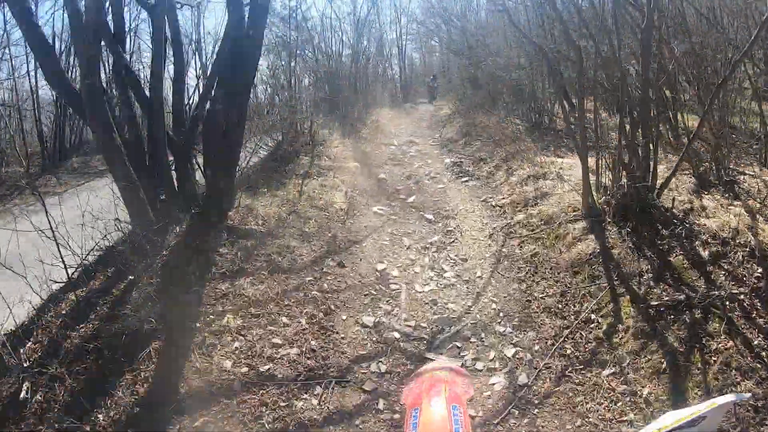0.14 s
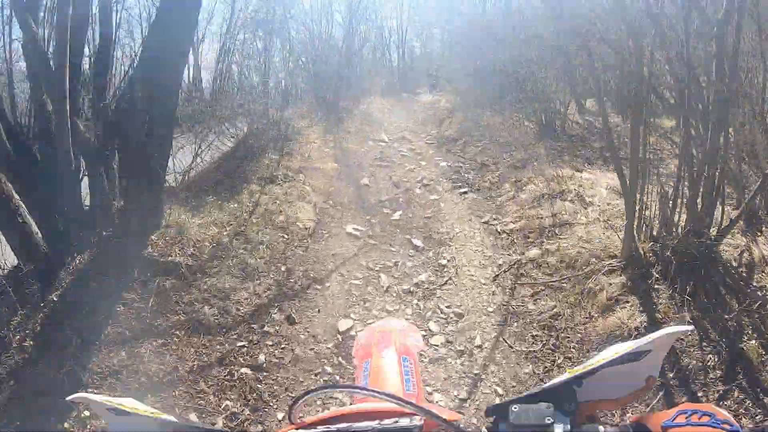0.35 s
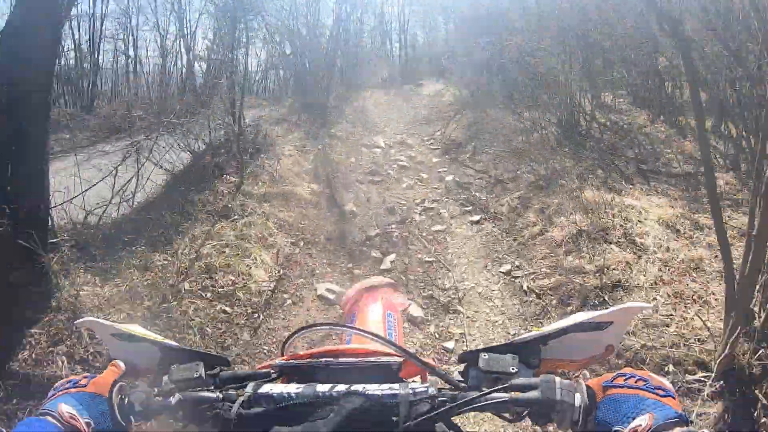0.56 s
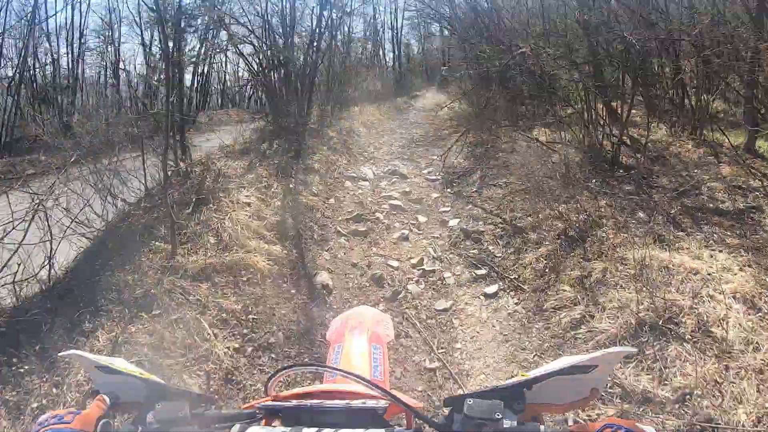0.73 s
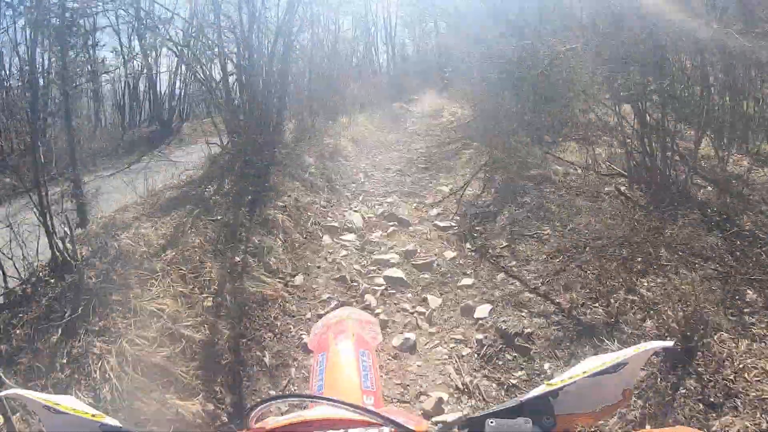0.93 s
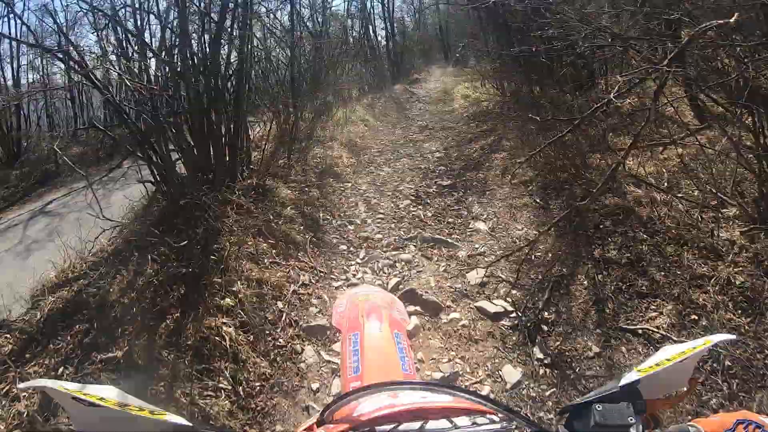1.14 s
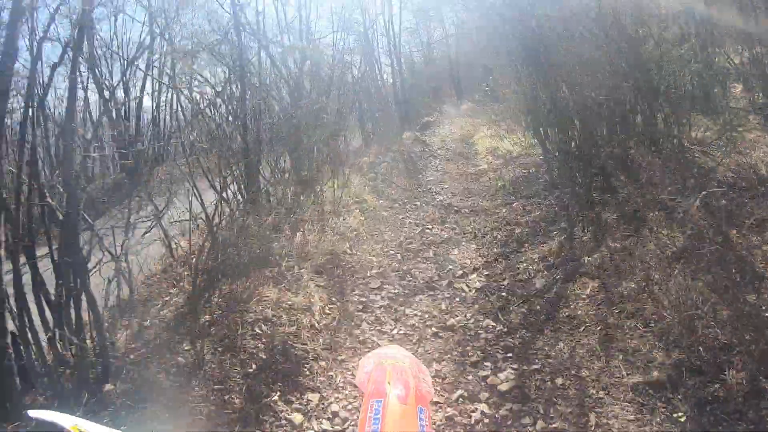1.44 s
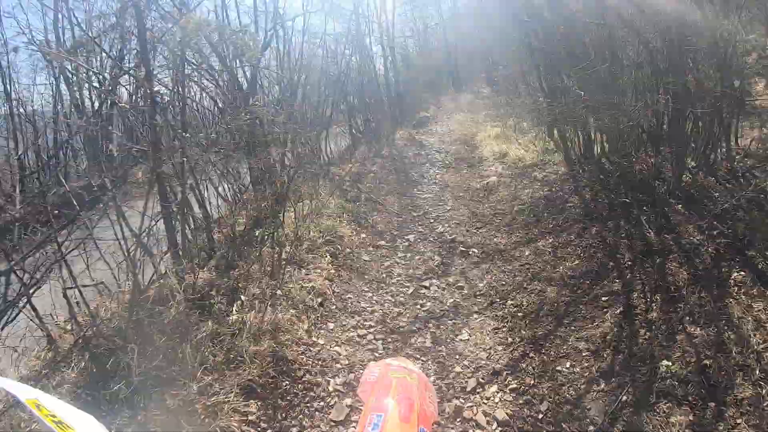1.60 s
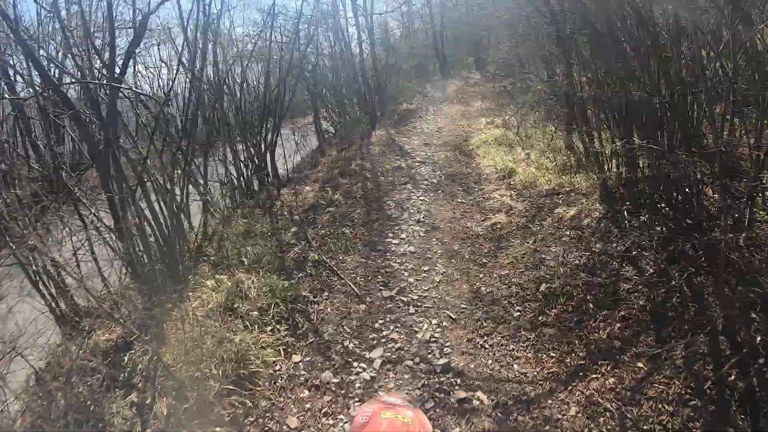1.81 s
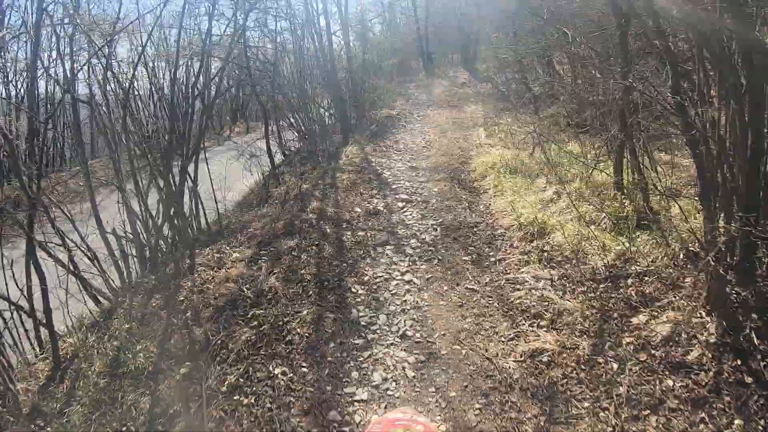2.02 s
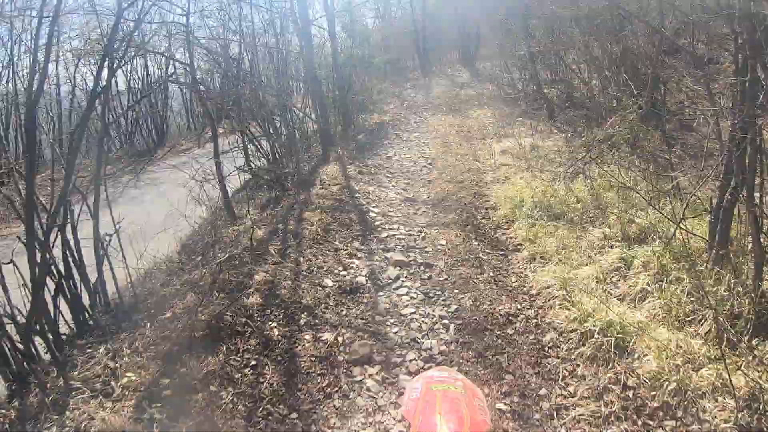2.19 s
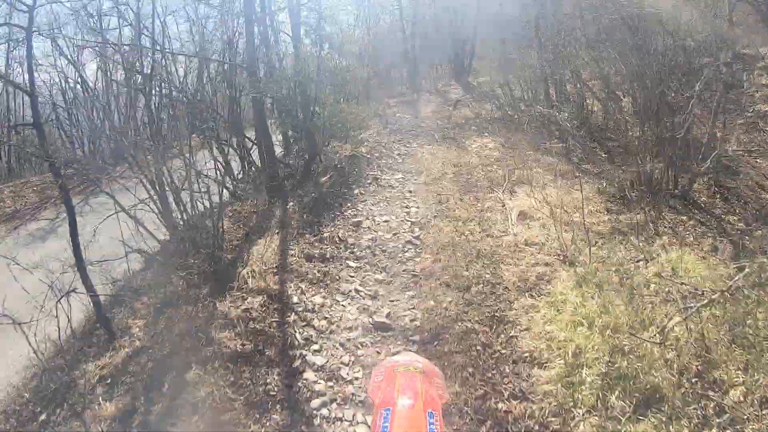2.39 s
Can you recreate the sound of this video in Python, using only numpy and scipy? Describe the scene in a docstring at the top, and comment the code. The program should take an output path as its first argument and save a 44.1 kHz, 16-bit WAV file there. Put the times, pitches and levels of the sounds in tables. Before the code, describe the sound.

A single-cylinder dirt bike climbs a stony woodland trail, heard close from the rider's seat: brief quiet coasting, a steady hollow intake honk, rising uneven revs, a throttle gap and blip, a last climb, then burbling deceleration.

```python
"""A single-cylinder dirt bike climbs a stony trail, heard from the rider's seat.
With the throttle open the airbox honks once per firing, as engine orders pass under its resonance.
The exhaust, also a sum of orders, barks roughly where the revs flare; at the end the throttle shuts
and decaying silencer modes burble. Filtered noise makes the clatter, hiss and clacks of the machine,
and the rumble of wind and ground beneath."""
import sys
import numpy as np
from scipy import signal
from scipy.fft import rfft, irfft, next_fast_len
from scipy.io import wavfile

SR = 44100
rng = np.random.default_rng(int(sys.argv[2]) if len(sys.argv) > 2 else 0)


def transcribe(signal):
    """Save signal, clipped to [-1, 1], as a 16-bit WAV file at the path in sys.argv[1]."""
    frames = np.atleast_2d(signal).T
    limited = np.clip(frames, -1, 1)
    pcm = np.round(limited * 32767).astype(np.int16)
    wavfile.write(sys.argv[1], SR, pcm)


N = 112454

# Strength of the intake honk, following the throttle. Each row: time in seconds, level in dB.
THROTTLE_LEVEL = [(0,-24.5),(.07,-37.5),(.18,-37),(.205,-18),(.228,-11),(.8,-11),(.88,-13.5),(1.0,-15),(1.12,-17.5),(1.27,-16.5),(1.32,-30.5),(1.385,-53),(1.405,-20),(1.417,-9.5),(1.46,-11.5),(1.485,-18),(1.52,-12.5),(1.56,-24.5),(1.61,-10),(1.8,-11.5),(1.9,-9.5),(2.11,-9),(2.15,-18),(2.18,-29),(2.55,-41.5)]
# Exhaust pulses. Each row: time in seconds, level in dB, roughness from 0 to 1.
EXHAUST_PULSES = [(0,-35.5,0.2),(.12,-37,0),(.24,-27.5,0.11),(.7,-26.5,0),(.93,-24,0.25),(1.04,-23.5,0.54),(1.28,-19.5,0),(1.37,-35,0.55),(1.44,-29,0.3),(1.51,-16,0.3),(1.57,-22.5,0.1),(1.64,-26,.2),(1.8,-24,0.25),(2.08,-45.5,.2),(2.15,-16.5,0.3),(2.19,-35,0.8),(2.55,-49,.7)]


def from_db(db):
    """Amplitude ratio of a level: 20 dB is a factor of ten."""
    return 10 ** (np.asarray(db) / 20)


def rms_one(x):
    """Normalise to unit mean-square power."""
    return x / np.sqrt(np.mean(x ** 2) + 1e-20)


def in_time(rows):
    """Linear interpolation: one curve for each column after the time."""
    seconds, *columns = np.transpose(rows)
    return [np.interp(np.arange(N) / SR, seconds, column) for column in columns]


def drift(rate_hz):
    """Random modulation of unit spread: white noise through two equal low-pass poles at rate_hz."""
    step = 40  # samples between the points of the slow curve
    warm_up = 2000  # points dropped while the filter settles
    pole = np.exp(-2 * np.pi * rate_hz * step / SR)
    noise = rng.standard_normal(N // step + warm_up + 2)
    slow = signal.lfilter([1], [1, -2 * pole, pole * pole], noise)[warm_up:]
    return np.interp(np.arange(N) / step, np.arange(len(slow)), rms_one(slow))


def colour(x, spectrum):
    """Spectral shaping: multiply the spectrum by a (Hz, dB) curve, then set unit power."""
    hz, db = np.transpose(spectrum)
    size = next_fast_len(N + SR // 2)  # padded against wrap-around
    f = np.maximum(np.arange(size // 2 + 1) * SR / size, 1)
    gain = from_db(np.interp(np.log(f), np.log(hz), db))
    return rms_one(irfft(rfft(x, size) * gain, size)[:N])


def beating_noise(cycles, share, fall):
    """Amplitude-modulated noise: a share of it jumps at each firing and decays through the cycle."""
    flare = rms_one(np.exp(-fall * (cycles % 1)))
    return rng.standard_normal(N) * (1 - share + share * flare)


def orders(cycles, speed, spectrum, rough, count):
    """Harmonic synthesis: multiples of the firing rate under a fixed colour, fluttering when rough."""
    pipe_lag = .347  # cycles behind the intake
    pipe_smear = .314  # radians per order squared: reflections spread each pulse
    hz, db = np.transpose(spectrum)
    out, power = 0, 0
    for k in range(1, count + 1):
        gain = from_db(np.interp(np.log(k * speed), np.log(hz), db))
        angle = 2 * np.pi * k * (cycles - pipe_lag) - pipe_smear * k * k
        in_phase = (1 + rough * drift(14)) * np.cos(angle)
        quadrature = rough * drift(31) * np.sin(angle)
        out = out + gain * (in_phase + quadrature)
        power = power + gain ** 2 * (.5 + rough ** 2)
    return out / np.sqrt(power)  # nominally unit power


def intake(cycles, speed):
    """Forced resonance: each gulp of air drives the airbox, whose steep peak selects engine orders."""
    # Moving airbox resonance. Each row: time in seconds, centre in Hz, width in Hz of one section.
    airbox = [(0,254,60),(.2,266.7,100),(.32,242.2,90),(.5,244.4,112),(.75,245,120),(.87,283,110),(.97,284,78),(1.1,276,150),(1.26,268,165),(1.46,296.4,91),(1.59,299,110),(1.66,247.6,85),(1.78,266.3,70),(1.88,251.6,130),(1.97,270,135),(2.13,247.5,129)]
    wobble_db, rough_wobble_db = 0.05, 2.0  # spread of strength: always, and at full roughness
    jitter = 0.0037  # spread of timing, cycles
    level_db, = in_time(THROTTLE_LEVEL)
    centre, width = in_time(airbox)
    _, rough = in_time(EXHAUST_PULSES)
    turn = np.exp(2j * np.pi * (cycles + jitter * drift(51)))
    out, power = 0, 0
    for k in range(1, 11):
        hz = k * speed
        resonance = 1 / (1 + 1j * (hz * hz - centre * centre) / (hz * width))
        skirt = 1 / (1 + 1j * (hz - centre) / (width * 0.5))
        gain = resonance ** 2 * skirt
        out = out + (gain * turn ** k).real
        power = power + abs(gain) ** 2 / 2
    level_db = level_db + wobble_db * drift(35) + rough_wobble_db * rough * drift(27)
    return out / np.sqrt(power) * from_db(level_db)


def exhaust(cycles, speed):
    """Periodic pulses as harmonics: phase dispersion smears each firing, roughness modulates it."""
    # Colour of the exhaust pipe. Each row: frequency in Hz, relative level in dB per engine order.
    pipe_colour = [(100,-5),(150,15),(190,6.5),(230,-7),(300,2),(380,2.5),(470,7.5),(540,-3.5),(610,-7),(710,-6),(850,-30)]
    level_db, rough = in_time(EXHAUST_PULSES)
    return from_db(level_db) * orders(cycles, speed, pipe_colour, rough, count=14)


def rasp(cycles, speed):
    """Harmonic growth: the high orders of the header pipe strengthen with throttle and revs."""
    # Colour of the header pipe. Each row: frequency in Hz, relative level in dB per order.
    header_colour = [(1350,-30),(1700,6.5),(2020,6.5),(2300,-9),(2600,-43.5)]
    full_throttle_db, at_rate_hz = -41, 96.6  # level at full throttle and this firing rate
    db_per_hz = 0.32  # change with the firing rate
    throttle_db, = in_time(THROTTLE_LEVEL)
    below_full_db = throttle_db - throttle_db.max()
    level_db = full_throttle_db + db_per_hz * (speed - at_rate_hz) + .5 * below_full_db
    return from_db(level_db) * orders(cycles, speed, header_colour, rough=.3, count=44)


def blares(cycles):
    """Ragged combustion as modulated noise: Gaussian swells where revs flare and the throttle snaps shut."""
    # Swells. Each row: centre in seconds, Gaussian half length in seconds, level in dB.
    swells = [(1.278,.02,-31),(1.51,.028,-30),(1.565,.016,-22),(2.15,.012,-28)]
    # Colour of the swells. Each row: frequency in Hz, relative level in dB per Hz.
    blare_colour = [(200,-25),(340,-1),(430,-1),(540,1),(660,-8),(900,-30),(4000,-90)]
    t = np.arange(N) / SR
    swell = sum(from_db(db) * np.exp(-.5 * ((t - s) / length) ** 2) for s, length, db in swells)
    return swell * colour(beating_noise(cycles, share=0.36, fall=0.94), blare_colour)


def burbles():
    """Modal response: stray firings on the shut throttle excite damped modes of the silencer."""
    # Stray firings. Each row: start in seconds, level in dB (a mode at 0 dB peaks 6 dB lower).
    stray_firings = [(2.142,-16),(2.206,-17),(2.27,-21),(2.343,-17),(2.404,-19),(2.514,-15)]
    # Silencer modes. Each row: frequency in Hz, level in dB, decay in seconds (peak at half of it).
    silencer_modes = [(96,-2.5,0.028),(162,1,0.011),(264.4,-11.5,0.036)]
    out = np.zeros(N)
    for s, db in stray_firings:
        age = np.maximum(np.arange(N) / SR - s, 0)
        for hz, mode_db, decay in silencer_modes:
            swell = age / decay * np.exp(1 - np.minimum(2 * age / decay, 20))
            out += from_db(db + mode_db) * np.sin(2 * np.pi * hz * age) * swell
    return out


def whine(cycles, speed):
    """Structural resonance: the engine cases ring at the upper orders."""
    # Strength of the ring. Each row: time in seconds, level in dB.
    ring_level = [(0,-44),(.15,-46),(.3,-41),(.6,-44),(.9,-37),(1.2,-35),(1.38,-42),(1.5,-32),(1.65,-36),(1.78,-32),(2.12,-28),(2.2,-42)]
    # Colour of the ring. Each row: frequency in Hz, relative level in dB per order.
    ring_colour = [(400,-30),(560,-6),(650,-1),(715,4),(800,-4),(950,3.5),(1030,-4),(1115,1),(1280,-9),(1550,-30)]
    level_db, = in_time(ring_level)
    return from_db(level_db) * orders(cycles, speed, ring_colour, rough=.14, count=32)


def clatter(cycles):
    """Impact noise of gears and valve train: broadband, partly modulated by the firing."""
    # Strength of the clatter. Each row: time in seconds, level in dB before the trim.
    clatter_level = [(0,-33.5),(.16,-37.5),(.4,-35.5),(.72,-36.5),(1.0,-31.5),(1.25,-30.5),(1.39,-31.5),(1.51,-27),(1.66,-35),(2.05,-31),(2.17,-28.5),(2.3,-32),(2.55,-36)]
    # Colour of the casing. Each row: frequency in Hz, relative level in dB per Hz.
    casing_colour = [(100,-16),(400,-7.5),(560,-2),(720,-2.5),(850,6),(1000,-1.5),(1150,3.5),(1310,-1),(1450,-11.5),(1650,-6.5),(1950,-14.5),(2400,-20.5),(2900,-47),(10000,-81.5)]
    trim_db, flicker_db = -2.5, 1.0
    level_db, = in_time(clatter_level)
    rattle = beating_noise(cycles, share=0.15, fall=0.97) * from_db(flicker_db * drift(35))
    return from_db(level_db + trim_db) * colour(rattle, casing_colour)


def hiss(cycles):
    """Friction noise of chain and gravel: fluctuating noise in a hiss band and a faint sizzle band."""
    # Strength of the hiss. Each row: time in seconds, level in dB before the trim.
    hiss_level = [(0,-49.5),(.17,-54.5),(.21,-50),(.66,-48.5),(1.0,-44.5),(1.29,-43.5),(1.38,-49.5),(1.52,-39),(1.63,-46.5),(1.9,-46.5),(2.15,-42),(2.28,-52),(2.55,-52.5)]
    # Colour of the hiss. Each row: frequency in Hz, relative level in dB per Hz.
    hiss_colour = [(1500,3),(2400,2.5),(2900,-4),(3600,0),(4100,-0.5),(4500,-3.5),(5500,-0.5),(6200,-5),(6700,-11.5),(7300,-21),(8500,-21),(9500,-30.5),(11000,-58.5),(16000,-72.5)]
    # Strength of the top sizzle. Each row: time in seconds, level in dB.
    sizzle_level = [(0,-125),(.75,-110),(.96,-68.5),(1.28,-68.5),(1.38,-66),(1.52,-62),(1.65,-71),(1.9,-71.5),(2.14,-68),(2.28,-73),(2.55,-79)]
    # Colour of the sizzle. Each row: frequency in Hz, relative level in dB per Hz.
    sizzle_colour = [(9000,-37),(11400,-25),(12200,4),(13000,-5),(14000,-0.5),(15700,-13.5)]
    trim_db = 1
    flicker_db = 0.85 * drift(96) + 0.97 * drift(7.7)
    grains = beating_noise(cycles, share=0.18, fall=1.4) * from_db(flicker_db)
    hiss_db, = in_time(hiss_level)
    sizzle_db, = in_time(sizzle_level)
    low = from_db(hiss_db + trim_db) * colour(grains, hiss_colour)
    top = from_db(sizzle_db) * colour(grains, sizzle_colour)
    return low + top


def gear_tone():
    """Frequency modulation: a thin wavering tone, probably the gears, as the throttle shuts."""
    # Strength of the tone. Each row: time in seconds, level in dB.
    tone_level = [(1.9,-60),(2.0,-40),(2.12,-39),(2.18,-33),(2.24,-39),(2.34,-55),(2.55,-60)]
    centre_hz, waver_hz = 1115, 10
    level_db, = in_time(tone_level)
    turns = np.cumsum(centre_hz + waver_hz * drift(15)) / SR
    return from_db(level_db + 2 * drift(20)) * rms_one(np.sin(2 * np.pi * turns))


def clacks():
    """Impacts of chain and chassis over stones: noise bursts with exponential decay."""
    # Knocks. Each row: start in seconds, nominal level at the onset in dB.
    knocks = [(.187,-26),(.203,-34),(2.257,-34)]
    # Colour of the knocks. Each row: frequency in Hz, relative level in dB per Hz.
    knock_colour = [(300,-6),(850,0),(1150,10),(1500,-9),(3000,-19),(5800,-15),(7000,-34),(12000,-60)]
    decay_s = .008
    t = np.arange(N) / SR
    strikes = sum(from_db(db) * (t >= s) * np.exp(-abs(t - s) / decay_s) for s, db in knocks)
    strength = np.sqrt(np.mean(strikes ** 2))
    return strength * colour(strikes * rng.standard_normal(N), knock_colour)


def rumble():
    """Turbulence and rough ground as low-frequency noise: lumpy churning gas over deep wind buffets."""
    # Strength of gas and ground. Each row: time in seconds, level in dB.
    churn_level = [(0,-29.5),(.12,-41.5),(.8,-40),(1.1,-22.5),(1.38,-27.5),(1.55,-19),(1.7,-23.5),(2.35,-26.5),(2.46,-31.5),(2.55,-31)]
    # Colour of gas and ground. Each row: frequency in Hz, relative level in dB per Hz.
    churn_colour = [(40,-22.5),(100,-8),(150,4),(260,3),(380,-2.5),(600,-18),(5000,-85.5)]
    # Strength of the wind buffets. Each row: time in seconds, level in dB.
    wind_level = [(0,-34),(.15,-44),(.28,-40.5),(.5,-48),(.72,-35.5),(.92,-36),(1.06,-32),(1.22,-32.5),(1.45,-33.5),(1.85,-30.5),(2.0,-33.5),(2.55,-32.5)]
    # Colour of the wind. Each row: frequency in Hz, relative level in dB per Hz.
    wind_colour = [(15,-9.5),(30,-5.5),(60,-3.5),(90,-1.5),(160,-22.5),(1000,-83)]
    churn_db, = in_time(churn_level)
    wind_db, = in_time(wind_level)
    lumps = rng.standard_normal(N) * from_db(1.5 * drift(5.3))
    churn = from_db(churn_db) * colour(lumps, churn_colour)
    wind = from_db(wind_db) * colour(rng.standard_normal(N), wind_colour)
    return churn + wind


def scene():
    """Superposition: one engine phase, the integral of the firing rate, drives the engine sounds."""
    # Engine speed. Each row: time in seconds, rate in firings per second.
    engine_speed = [(0,76),(.175,69),(.2,60.5),(.27,59.5),(.33,54.7),(.44,58.8),(.49,63),(.54,59.4),(.6,60),(.67,62.3),(.705,60.2),(.75,64.4),(.8,64.7),(.87,71.7),(.945,70.4),(1.0,76.5),(1.04,76.3),(1.065,71.5),(1.1,76.5),(1.18,78.5),(1.21,70),(1.295,88.5),(1.34,72),(1.415,68),(1.47,82.5),(1.512,97.5),(1.58,84.5),(1.61,75),(1.657,65.8),(1.755,75.5),(1.8,74.4),(1.865,71.3),(1.94,81),(2.032,93.6),(2.07,91),(2.145,98),(2.2,86),(2.33,68),(2.55,60.5)]
    speed, = in_time(engine_speed)
    cycles = np.cumsum(speed) / SR
    pipe = exhaust(cycles, speed) + rasp(cycles, speed) + blares(cycles) + burbles()
    machinery = whine(cycles, speed) + clatter(cycles) + hiss(cycles) + clacks()
    return (intake(cycles, speed) + pipe + machinery + rumble())[None]


def record(dry):
    """Band limiting: a steep elliptic low-pass removes the top."""
    cutoff_hz, ripple_db, stop_db = 15700, .1, 80
    low_pass = signal.ellip(10, ripple_db, stop_db, cutoff_hz, fs=SR, output="sos")
    return signal.sosfilt(low_pass, dry)


dry = scene()
out = record(dry)
transcribe(out)
```